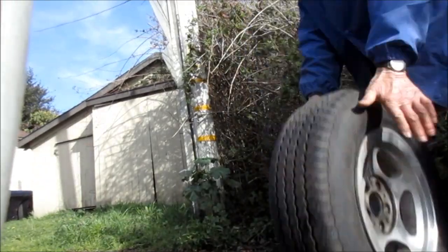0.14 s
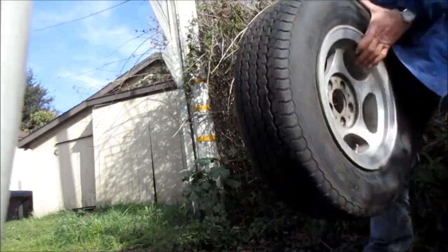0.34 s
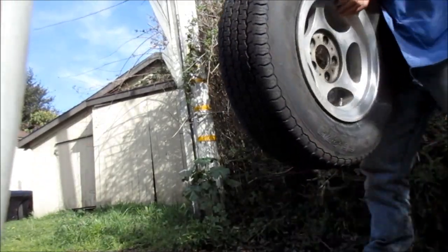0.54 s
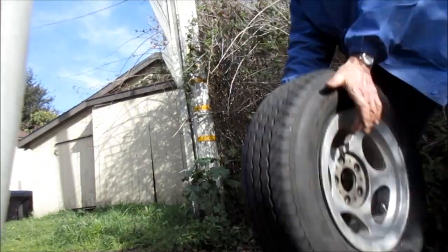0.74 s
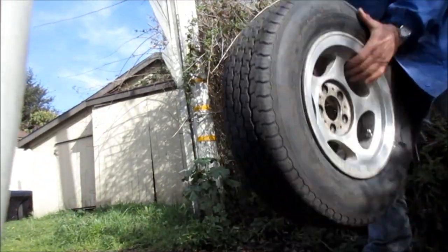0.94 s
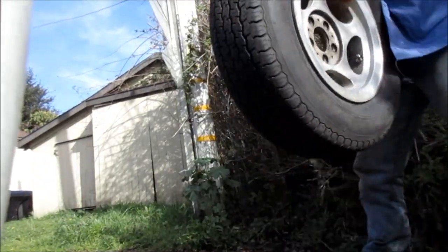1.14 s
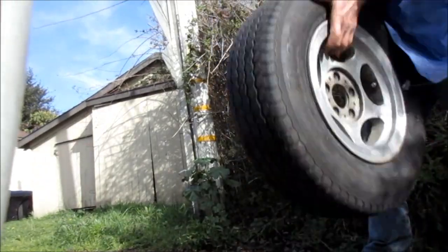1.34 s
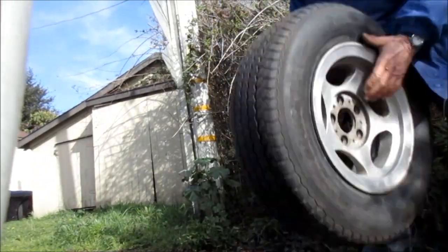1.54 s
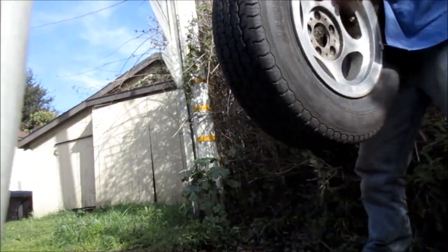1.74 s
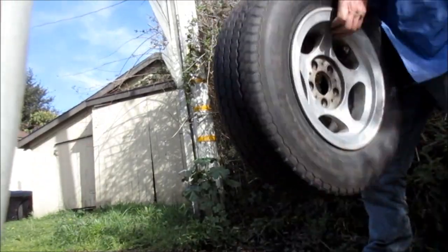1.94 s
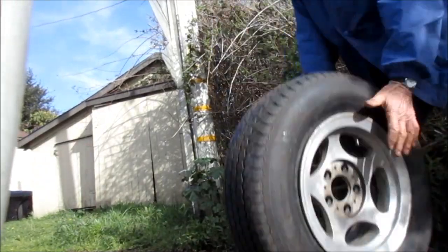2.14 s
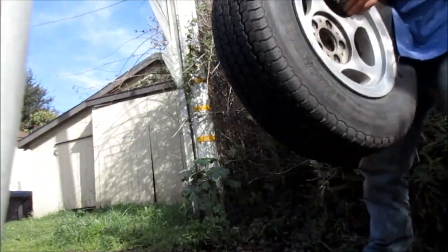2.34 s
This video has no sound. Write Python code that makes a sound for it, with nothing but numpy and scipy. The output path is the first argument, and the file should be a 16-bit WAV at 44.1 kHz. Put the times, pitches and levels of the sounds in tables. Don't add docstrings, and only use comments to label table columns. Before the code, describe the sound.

A car tyre on an alloy wheel is bounced on hard ground, landing at about 0.2, 0.9, 1.5 and 2.1 seconds. Each hit is a loud, dry slap with a short hollow rubber thump and a spray of grit; the last is softer. Between hits, the rim hums very faintly, a nylon jacket rustles, and hands tick and scuff. Low distant traffic runs beneath, close and outdoors.

```python
import sys
import numpy as np
from scipy import signal
from scipy.io import wavfile

SR = 44100
rng = np.random.default_rng(int(sys.argv[2]) if len(sys.argv) > 2 else 0)


def invert_db(x):
    u = np.asarray(x, float) / 20
    return 10 ** u


def materialize(psi):
    bounded = np.clip(np.atleast_2d(psi).T, -1, 1)
    quanta = np.round(bounded * 32767).astype(np.int16)
    wavfile.write(sys.argv[1], SR, quanta)


N = 110250

# start_s, squeezed_air_db, tread_slap_db, slap_pitch_hz, far_shoulder_db
LANDINGS = [
    (0.2322, -7, -2.5, 1500, -2),
    (0.8595, -4.5, 2, 1720, -10.5),
    (1.501, -6.5, -3, 1725, -12),
    (2.1356, -26, -10, 1630, -39),
]
# tyre_body_db, air_cavity_db, rim_hum_db, scattered_grit_db, tread_ring_db
BODY = [
    (3.2, -0.5, -45, -25.5, -52.5),
    (-1.5, -0.5, -46.5, -25.5, -17),
    (-4, -4, -57, -27.5, -13),
    (-9.5, -4, -44.5, -25, -20),
]
PEEL_S = 0.0232


def rms_one(x):
    return x / np.sqrt(np.mean(x ** 2) + 1e-20)


def drift(rate_hz):
    r = np.exp(-80 * np.pi * rate_hz / SR)
    steps = rng.standard_normal(N // 40 + 2002)
    slow = signal.lfilter([1], [1, -2 * r, r * r], steps)[2000:]
    return np.interp(np.arange(N) / 40, np.arange(len(slow)), rms_one(slow))


def fade(t, t60):
    return (t >= 0) * invert_db(-60 * np.maximum(t, 0) / t60)


def mode(t, hz, db, t60):
    return invert_db(db) * fade(t, t60) * np.sin(2 * np.pi * hz * t)


def bump(t, db, width_s):
    return invert_db(db) * np.exp(-(t / width_s) ** 2 / 2)


def progress(start_s, length_s):
    return np.clip((np.arange(N) / SR - start_s) / length_s, 0, 1)


def bandpass(x, low_hz, high_hz, order=2):
    return signal.sosfilt(signal.butter(order, [low_hz, high_hz], "band", fs=SR, output="sos"), x)


def lowpass(x, hz, order):
    return signal.sosfilt(signal.butter(order, hz, fs=SR, output="sos"), x)


def banded_noise(spectrum, patchy_db, rate):
    out, together = 0, drift(rate)
    edges = 25 * 2 ** np.arange(0, 9.6, 0.5)
    white = rng.standard_normal((2, N))
    hz, db = np.transpose(spectrum)
    for k, (low, high) in enumerate(zip(edges, edges[1:])):
        band = bandpass(white[k % 2], low, high)
        level_db = np.interp(np.log(low * high) / 2, np.log(hz), db, left=db[0] - 24)
        flicker_db = patchy_db * (together + drift(rate))
        out = out + invert_db(level_db + flicker_db) * band
    return rms_one(out)


def squeezed_air(t, lead, air_db, slap_hz):
    build_up = np.exp(np.minimum(lead, 0) / 0.00026)
    swing_back = (t < 0) * np.cos(2 * np.pi * slap_hz * lead)
    return invert_db(air_db) * np.where(lead < 0, build_up, swing_back)


def tread_slap(t, slap_hz, slap_db, ring_db):
    return mode(t, slap_hz, slap_db + 1.5, 0.0013) + mode(t, slap_hz, ring_db, 0.013)


def tyre_body(t, carcass_db, cavity_db, own):
    # pitch_hz, level_db, t60_s
    carcass = [
        (159.6, -28.5, 0.18),
        (214.4, -20.5, 0.078),
        (276, -22.5, 0.091),
    ]
    # pitch_hz, level_db, t60_s
    cavity = [(602, -28.5, 0.072), (830, -47, 0.039), (1050, -19, 0.017), (1245, -14.5, 0.013),
              (1973, -16, 0.017), (702, -23.5, .04), (2740, -35, .025)]
    out = sum(mode(t, hz, db + carcass_db, t60) for hz, db, t60 in carcass)
    for (hz, db, t60), o in zip(cavity, own):
        out = out + mode(t, hz * (1 + 0.038 * o), db + cavity_db + 0.5 * o, t60)
    return out


def tyre():
    # pitch_hz, level_db (per Hz)
    scatter_spectrum = [(290, -28.5), (500, 1.1), (1210, -10.5), (1700, -9.5), (3000, -21), (4200, -36),
                        (8000, -46), (15000, -60)]
    # crack_db, far_shoulder_delay_s, thump_db, belt_ring_db, tread_rasp_db
    attacks = [
        (-20.5, 0.002134, -22.5, -33, -55),
        (-31.5, .0024, -21, -35, -46),
        (-22.5, 0.0023, -22.5, -39, -37.5),
        (-32.5, 0.0021, -19.5, -40, -34.5),
    ]
    # first_db, second_db
    columns = [
        (-24, -23.5),
        (-28.5, -28),
        (-24.5, -46),
        (-22.5, -44),
    ]
    rubber, dust = np.zeros(N), np.zeros(N)
    scatter = banded_noise(scatter_spectrum, patchy_db=3.55, rate=30.0)
    crack = bandpass(rng.standard_normal(N), 5400, 11000)
    rasp = rms_one(bandpass(rng.standard_normal(N), 1500, 3240, order=3))
    spread = rng.normal(0, 1, (len(LANDINGS), 7))
    for landing, body, own, attack, column in zip(LANDINGS, BODY, spread, attacks, columns):
        start_s, air_db, slap_db, slap_hz, shoulder_db = landing
        carcass_db, cavity_db, _, scatter_db, ring_db = body
        crack_db, shoulder_s, thump_db, belt_db, rasp_db = attack
        first_db, second_db = column
        near = slice(int(start_s * SR) - 400, int(start_s * SR) + SR // 2)
        t = np.arange(N)[near] / SR - start_s
        lead = t + 0.2 / slap_hz
        out, grit = rubber[near], dust[near]

        out += squeezed_air(t, lead, air_db, slap_hz)
        out -= tread_slap(t, slap_hz, slap_db, ring_db)
        out -= bump(t - shoulder_s, shoulder_db, 0.00026)
        out += bump(t - PEEL_S, -25, 0.0011)
        out += mode(t, 51, thump_db, 0.11)
        out -= mode(t, 118.7, belt_db, 0.37)
        out -= mode(t, 332.2, first_db, 0.1) + mode(t, 466.4, second_db, 0.064)
        out -= tyre_body(t, carcass_db, cavity_db, own)

        grit += invert_db(rasp_db) * rasp[near] * fade(t, 0.052)
        grit += invert_db(scatter_db) * scatter[near] * fade(t - 0.001, 0.12)
        peel_hiss = bump(t - PEEL_S, -55, 0.0016)
        grit += crack[near] * (invert_db(crack_db) * fade(lead, 0.01) + peel_hiss)
    return lowpass(rubber, 4400, 3) + dust


def rim():
    hold_s = [
        2.4,
        3.2,
        6,
        1.1,
    ]
    hum_hz, free_s, swell_s = 291.6, 0.022, 0.013
    t = np.arange(N) / SR
    level = invert_db(-54.5) * fade(t, 5.65)
    for (start_s, *_), (_, _, hum_db, *_), t60 in zip(LANDINGS, BODY, hold_s):
        free = t - start_s - free_s
        hum = invert_db(hum_db) * fade(free, t60) * np.clip(free / swell_s, 0, 1)
        level = np.where(t < start_s, level, hum)
    return level * invert_db(0.52 * drift(5.0)) * np.sin(2 * np.pi * hum_hz * t)


def jacket():
    # pitch_hz, level_db (per Hz)
    nylon = [(410, -30), (700, 1.5), (827, -15.5), (1330, -5), (1450, -9), (2160, -6), (2800, -11.5),
             (7040, -11), (15000, -24.5)]
    # start_s, length_s, level_db, brightness_db
    arms = [(0.08, 0.21, -59.5, -0.3), (0.301, 0.18, -53, -0.7), (0.397, 0.32, -57.5, -0.84),
            (0.723, 0.17, -60.5, 1.9), (0.904, 0.26, -58, -0.5), (1.143, 0.19, -56, 0.4),
            (1.366, 0.14, -54.5, -0.3), (1.552, 0.17, -59.5, 0), (1.654, 0.31, -68.5, -1.7),
            (2.008, 0.14, -71.5, 2.5), (2.183, 0.22, -54.5, 0.5), (2.376, 0.26, -55.5, -0.4)]
    rise = 0.52
    hiss = invert_db(1.73 * drift(150.0)) * banded_noise(nylon, patchy_db=0.77, rate=10.4)
    dull = lowpass(hiss, 6500, 1)
    bright = hiss - dull
    out = invert_db(-72.5) * hiss
    for start_s, length_s, db, bright_db in arms:
        u = progress(start_s, length_s)
        swell = np.sin(np.pi / 2 * np.minimum(u / rise, (1 - u) / (1 - rise)))
        cloth = invert_db(-2.5 * bright_db) * dull + invert_db(2.4 * bright_db) * bright
        out += invert_db(db - 0.5) * swell * cloth
    return out


def ticks():
    # start_s, peak_db, pitch_hz
    knocks = [(.097, -52, 2480), (0.742, -47, 900), (.296, -45, 9000), (.312, -45, 2840), (.805, -42, 740),
              (.998, -38.5, 9000), (1.013, -42.5, 1500), (1.269, -43, 8000), (1.588, -50, 910),
              (1.634, -39.5, 500), (1.718, -54, 4550), (1.922, -41, 5430), (2.062, -47, 1500),
              (2.078, -45, 1500), (2.226, -51, 800), (2.297, -38, 650)]
    out, grit = np.zeros(N), rng.standard_normal((len(knocks), 2000))
    for (start_s, db, hz), noise in zip(knocks, grit):
        dying = noise * fade(np.arange(2000) / SR, 0.007 + 9.0 / hz)
        burst = bandpass(dying, hz / 2.5, min(hz * 2.2, 16000), order=1)
        first = int(start_s * SR)
        out[first:first + 2000] += invert_db(db) * burst / np.abs(burst).max()
    return out


def squeak():
    # start_s, length_s, from_hz, to_hz, level_db
    zips = [
        (0.124, 0.031, 8500, 9500, -55),
        (1.014, 0.071, 6760, 3800, -56.5),
        (1.35, 0.024, 3000, 4030, -63.5),
        (1.352, 0.028, 4020, 5200, -65),
        (1.65, 0.087, 6240, 4680, -68),
        (1.776, 0.12, 6200, 5800, -62),
        (.36, 0.075, 6000, 5600, -55),
        (2.27, 0.086, 6000, 6400, -56),
    ]
    out = np.zeros(N)
    rough = rms_one(lowpass(rng.standard_normal(N), 380, 2))
    for start_s, length_s, from_hz, to_hz, db in zips:
        u = progress(start_s, length_s)
        cycles = length_s * (from_hz * u + (to_hz - from_hz) * u ** 2 / 2)
        out += invert_db(db) * np.sin(np.pi * u) * rough * np.sin(2 * np.pi * cycles)
    return out


def scuffs():
    # start_s, length_s, level_db
    slides = [
        (0.109, 0.15, -52.5),
        (.78, 0.075, -52.5),
        (1.57, .11, -53),
        (2.034, 0.12, -54),
        (2.178, 0.207, -53),
        (0.344, 0.069, -57.5),
    ]
    lumpy = rng.standard_normal(N) * invert_db(3 * drift(80))
    rub = rms_one(bandpass(lumpy, 300, 1047))
    return rub * sum(invert_db(db) * np.sin(np.pi * progress(start_s, length_s)) for start_s, length_s, db in slides)


def engine():
    # start_s, length_s, pitch_hz, level_db
    surges = [
        (.32, 0.083, 60.3, -51.5),
        (.48, .17, 82, -51.5),
        (.7, 0.1, 70, -52),
        (1.32, 0.12, 78, -53),
        (1.62, 0.17, 64.8, -59),
        (2.38, 0.13, 82, -56.5),
    ]
    t, out = np.arange(N) / SR, np.zeros(N)
    for start_s, length_s, hz, db in surges:
        out += invert_db(db) * np.sin(np.pi * progress(start_s, length_s)) * np.sin(2 * np.pi * hz * t)
    return out


def yard():
    # pitch_hz, level_db (per Hz)
    rumble = [(15, -36), (25, -3.5), (69, 0.5), (184, -5.5), (291, -4.5), (439, -9), (1180, -14.5),
              (3970, -37), (6000, -42), (7800, -60.5), (13200, -120)]
    return invert_db(-55) * banded_noise(rumble, patchy_db=-0.9, rate=1.7)


def scene():
    wheel = tyre() + rim()
    person = jacket() + ticks() + squeak() + scuffs()
    background = engine() + yard()
    mic_hiss = invert_db(-78) * rng.standard_normal(N)
    return (wheel + person + background + mic_hiss)[None]


def band_limit(x):
    return signal.sosfilt(signal.butter(12, 16750, fs=SR, output="sos"), x)


def record(dry):
    dip_hz, dip_width_hz, dip_share, ceiling = 9900, 300, 0.7, 0.84
    dip = signal.lfilter(*signal.iirpeak(dip_hz, dip_hz / dip_width_hz, fs=SR), dry)
    clipped = np.clip(dry - dip_share * dip, -ceiling, ceiling)
    cut = signal.sosfilt(signal.ellip(8, 0.5, 45, 15850, fs=SR, output="sos"), clipped)
    return band_limit(cut)


dry = scene()
out = record(dry)
materialize(out)
```